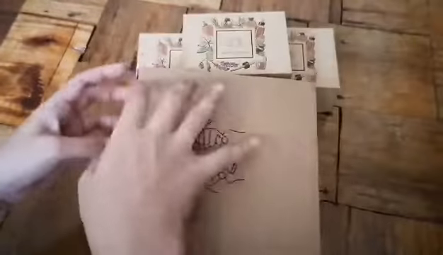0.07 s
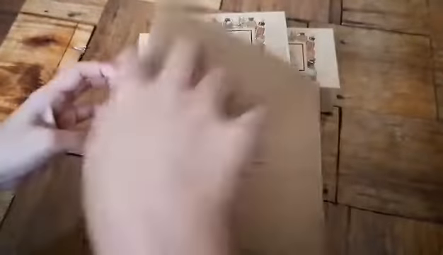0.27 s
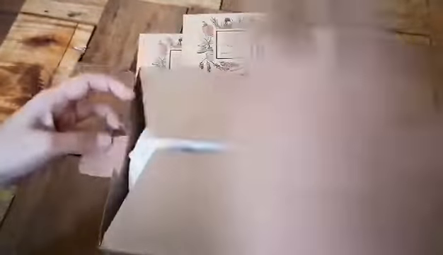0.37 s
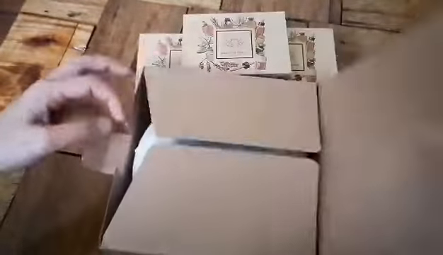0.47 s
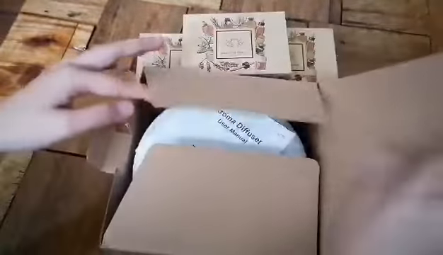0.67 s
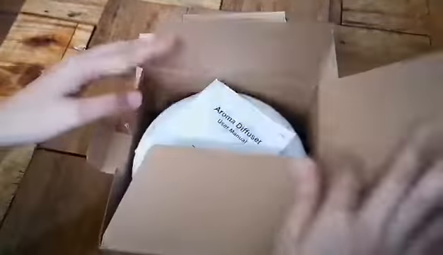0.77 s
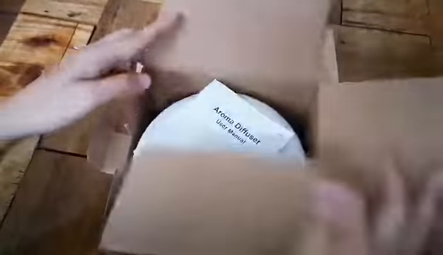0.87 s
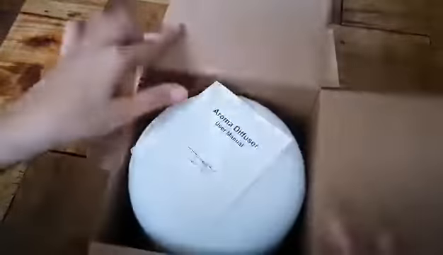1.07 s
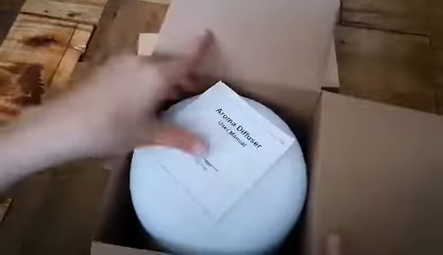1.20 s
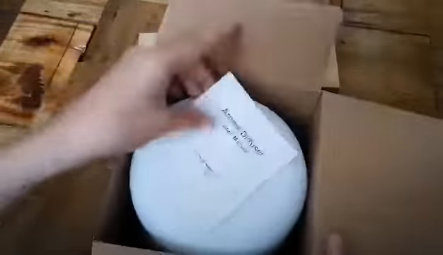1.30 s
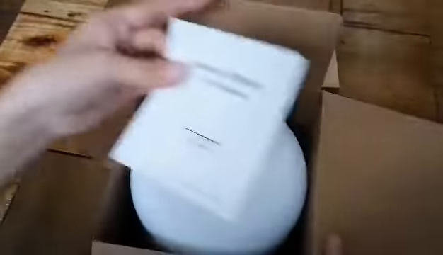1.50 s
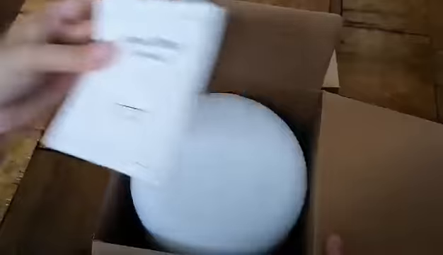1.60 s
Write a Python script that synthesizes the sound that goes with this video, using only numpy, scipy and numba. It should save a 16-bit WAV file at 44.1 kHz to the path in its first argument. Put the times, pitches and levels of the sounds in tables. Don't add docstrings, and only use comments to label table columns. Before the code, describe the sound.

Cardboard box flaps being opened by hand, with rustles, knocks and a final paper swish

```python
import sys
import numpy as np
from scipy import signal
from scipy.io import wavfile
from scipy.ndimage import uniform_filter1d
from numba import njit

SR = 44100
rng = np.random.default_rng(int(sys.argv[2]) if len(sys.argv) > 2 else 0)


def level_to_linear(level):
    exponent = np.asarray(level, float) / 20
    return 10 ** exponent


def generate_wav(signal):
    frames = np.transpose(np.atleast_2d(signal))
    scaled = np.clip(frames, -1, 1) * 32767
    pcm = np.round(scaled).astype(np.int16)
    wavfile.write(sys.argv[1], SR, pcm)


N = 72765

# f/Hz, level/dB
AIR_SPECTRUM = [(25, -1), (60, -12.5), (200, -29), (1000, -25.5), (3000, -33.5), (4000, -40.5),
                (7000, -27.5), (13000, -72)]
# t/s, level/dB
HANDLING_LEVEL = [(0, -63.5), (.2, -58.5), (.3, -52), (.38, -62), (.5, -49.5), (.62, -49), (.74, -49.5),
                  (.8, -60.5), (.86, -47), (1.0, -59.5), (1.1, -57.5), (1.302, -48.5), (1.42, -59.5),
                  (1.65, -66.5)]
# f/Hz, bandwidth/Hz, level/dB
BODY_MODES = [(34, 15.4, -10.5), (54.4, 46, 5.5), (95, 115, 6.5), (130.6, 37, 6.5), (200, 240, -3),
              (228, 35, 1), (289, 16, -18)]
# peak t/s, rise/s, fall T60/s, board level/dB, paper level/dB
RUB_STROKES = [(0.049, 0.096, 1, -61.5, -65.5), (0.167, 0.019, 0.17, -64, -67),
               (0.236, 0.023, 0.79, -47.5, -62), (0.268, 0.044, 0.096, -42.5, -45),
               (0.29, 0.03, 0.077, -41, -36), (.31, 0.011, 0.43, -81, -49.5),
               (0.447, 0.0056, 0.029, -48.5, -52), (.461, 0.0079, 0.085, -54, -48),
               (0.469, 0.0077, 0.027, -41, -33.5), (0.477, 0.0075, 0.09, -66.5, -39.5),
               (.486, .008, 0.18, -53, -44.5), (0.498, 0.012, 0.22, -55, -46.5),
               (0.666, 0.0061, 0.022, -36, -32.5), (0.681, 0.029, 0.3, -46, -46.5),
               (0.737, 0.054, 0.13, -62, -53), (0.772, 0.0092, 0.033, -76, -51.5),
               (.845, 0.017, 0.24, -54, -53), (0.877, 0.042, 0.17, -53.5, -51),
               (0.899, 0.024, 0.18, -63, -53.5), (0.948, 0.012, 0.31, -57, -66.5),
               (0.991, 0.032, 0.28, -61, -56.5), (1.023, 0.013, 0.28, -60.5, -61),
               (1.1, 0.049, 0.99, -65.5, -64.5), (1.206, 0.036, 0.39, -57.5, -53),
               (1.259, 0.0067, 0.09, -46, -45), (1.294, 0.0059, 0.24, -44, -46),
               (1.346, 0.011, 0.16, -50, -61), (1.384, 0.011, 0.14, -47.5, -53.5),
               (1.403, 0.014, 0.21, -62, -55)]
# f/Hz, bandwidth/Hz, level/dB
BOARD_MODES = [(450, 270, 0), (728, 180, -0.5), (1070, 510, 0.5), (1700, 365, 1), (1900, 300, -0.5),
               (2620, 350, -3.5), (3266, 420, -2)]
# f/Hz, bandwidth/Hz, level/dB
PAPER_MODES = [(5000, 2000, -3.5), (6000, 1120, -7.5), (6950, 880, -4), (8160, 1800, -8.5),
               (10030, 370, -15), (11750, 1700, -16)]
# t/s, peak level/dB, f/Hz, T60/s
FINGER_TAPS = [(.012, -48, 845, 0.063), (.045, -52, 906, 0.067), (.158, -50, 1310, 0.12),
               (.166, -42.5, 783, 0.082), (.228, -55, 2760, 0.12), (.235, -43.5, 3920, 0.064),
               (.207, -51.5, 1290, .03), (.2825, -30, 2685, 0.03), (.302, -46, 2700, .03),
               (.318, -46, 2782, 0.047), (.4672, -29.5, 1701, 0.023), (.488, -48.5, 780, 0.12),
               (.616, -47, 618, 0.076), (.664, -40.5, 1038, 0.12), (.661, -35.5, 575, 0.037),
               (.675, -38, 533, 0.018), (.676, -47.5, 1500, 0.022), (.706, -46.5, 636, 0.039),
               (.738, -49, 756, .03), (.77, -51.5, 760, .03), (.822, -46.5, 1065, 0.03),
               (.829, -51, 1053, 0.042), (.84, -48, 757, 0.066), (.855, -44, 506, 0.065),
               (.863, -54.5, 2388, 0.2), (.904, -52, 1700, 0.034), (.945, -51.5, 634, 0.044),
               (.988, -47, 1810, 0.034), (1.019, -54.5, 2980, 0.018), (1.021, -50, 1760, 0.028),
               (1.022, -56.5, 804, 0.058), (1.141, -54.5, 623, 0.046), (1.18, -49, 510, 0.026),
               (1.192, -47.5, 450, 0.12), (1.2, -45.5, 760, 0.078), (1.243, -47, 820, 0.031),
               (1.262, -43.5, 624, 0.045), (1.2908, -35.5, 788, 0.051), (1.2912, -35, 1086, 0.042),
               (1.291, -29, 1830, 0.019), (1.292, -47, 2090, 0.014), (1.203, -46.5, 1673, .03),
               (1.226, -54, 1700, .05), (1.292, -36.5, 443, 0.035), (1.338, -48, 1750, 0.024),
               (1.369, -41.5, 957, 0.043), (1.38, -38.5, 990, 0.015), (1.381, -44, 1756, 0.032),
               (1.433, -53.5, 780, 0.019)]
# t/s, peak level/dB, centre f/Hz
CREASE_CRACKS = [(.052, -45.5, 5000), (0.433, -45, 1010), (0.945, -56, 900), (0.2842, -42, 3870),
                 (0.4454, -48, 7950), (.4475, -34, 5000), (.476, -26.5, 6000), (.4935, -40, 4000),
                 (0.5, -47, 6000), (.822, -49, 4000), (.838, -50, 1500), (.855, -58, 1990),
                 (.876, -51, 5000), (1.02, -53, 2500), (1.37, -55, 2000), (0.4685, -23.5, 5000),
                 (0.6637, -41, 3830), (0.741, -38, 5000), (1.259, -47, 6000), (1.2907, -22, 1780)]
# t/s, peak level/dB, f/Hz, T60/s
FLAP_BOOMS = [(.163, -47.5, 254, 0.083), (.236, -48, 244.4, 0.33), (.281, -39.5, 175.5, 0.096),
              (.285, -38.5, 279, 0.019), (.313, -48, 252, 0.036), (.312, -51, 86, 0.091),
              (.406, -44, 242, 0.033), (.4345, -39, 273, 0.048), (.487, -44, 227, 0.068),
              (.508, -48, 252, 0.11), (.54, -50, 233, 0.14), (.58, -40.5, 292, 0.048),
              (.602, -41, 252, 0.076), (.615, -39, 95, 0.089), (.6623, -30.5, 241, 0.15),
              (.6743, -33.5, 216, 0.053), (.6947, -40, 239.3, 0.24), (.838, -39.5, 127.6, 0.093),
              (.872, -43, 123.4, 0.02), (.91, -45, 205, 0.024), (.926, -39.5, 141, 0.037),
              (.9432, -35.5, 163, 0.057), (.978, -41.5, 170, 0.06), (.9972, -37.5, 159, 0.046),
              (1.018, -40, 193, 0.023), (1.034, -46.5, 206, 0.043), (1.15, -49.5, 144, 0.048),
              (1.22, -45, 124, 0.19), (1.268, -40, 95, 0.065), (1.291, -39, 256, 0.021),
              (1.297, -41, 122, 0.035), (1.3705, -38, 293, 0.015)]
# t/s, f/Hz, level/dB
EDGE_SQUEAK = [
    (.232, 2060, -62),
    (0.239, 2040, -44.5),
    (.25, 2010, -37),
    (0.258, 1980, -28),
    (.268, 1978, -33),
    (.275, 1874, -59),
    (.283, 1754, -30),
    (0.286, 1700, -30),
    (0.291, 1660, -56),
]
# f/Hz, bandwidth/Hz, level/dB
SHEET_MODES = [(5930, 1900, -3.5), (7800, 1040, 3), (9500, 2900, -2.5), (12500, 1500, -8)]
BODY_LAGS = (1, 4, 10)

OVERTONE = 2.1
FLICKER_DB = 5.5
LEFT_DB = -4.8
CRACK_T60_S, CRACK_TOP_HZ = 0.0075, 10100
SLIDE_S, SLIDE_HALF_S, SLIDE_DB = 1.5, 0.021, -44.5
BRUSH_S, BRUSH_HALF_S, BRUSH_DB, BRUSH_HZ = 1.12, 0.33, -67.5, 11300
APART = 0.92
PORT_HZ, PORT_ECHO, SHADOW_HZ = 560, 0.37, 12700
ROOM_T60_S, ROOM_DB, ROOM_HZ = 0.15, -14.5, 1500


@njit
def svf(x, hz, width):
    y, b, l = np.empty(len(x)), 0., 0.
    g, k = np.tan(np.pi * hz / SR), width / hz
    for i in range(len(x)):
        v = (b + g * (x[i] - l)) / (1 + g * (g + k))
        b, l, y[i] = 2 * v - b, l + 2 * g * v, k * v
    return y


def band(x, hz, width):
    return svf(svf(x, hz, width), hz, width)


def unit(x):
    return x / np.sqrt(np.mean(x ** 2))


def fade(t, t60):
    return np.exp(-np.log(1000) * t / t60)


def walk(rate):
    k = int(SR / rate)
    steps = np.repeat(rng.standard_normal(N // k + 1), k)
    return uniform_filter1d(uniform_filter1d(steps, k), k)[:N]


def resonate(x, table, flicker_db, rate):
    total = np.zeros(N)
    for k, (hz, width, db) in enumerate(table):
        level = level_to_linear(db + flicker_db * walk(rate))
        total += (-1) ** k * level * unit(band(x, hz, 2.0 * width))
    return unit(total)


def air():
    hz, db = np.array(AIR_SPECTRUM).T
    total = np.zeros(N)
    for f in 28 * 2 ** np.arange(0, 9, .5):
        level = level_to_linear(np.interp(np.log(f), np.log(hz), db) + 2.5 * walk(7.63))
        total += level * band(rng.standard_normal(N), f, f / 2)
    return level_to_linear(-64.5) * unit(total)


def handling():
    s, db = np.array(HANDLING_LEVEL).T
    level = level_to_linear(np.interp(np.arange(N) / SR, s, db) - 3)
    return level * resonate(rng.standard_normal(N), BODY_MODES, flicker_db=3.5, rate=24.8)


def grit():
    draw = rng.random((N, 2))
    size = level_to_linear(-2 * np.log(1 - .95 * draw[:, 1]))
    slips = draw[:, 0] < 4000 / SR
    return slips * size * rng.standard_normal(N) + 0.15 * rng.standard_normal(N)


def rubbing():
    t = np.arange(N) / SR
    board, paper = np.zeros(N), np.zeros(N)
    for s, rise, t60, board_db, paper_db in RUB_STROKES:
        swell = np.exp(-2 * ((s - t) / rise) ** 2)
        power = np.where(t < s, swell, fade(np.maximum(t - s, 0), t60)) ** 2
        board += level_to_linear(2 * board_db) * power
        paper += level_to_linear(2 * paper_db) * power
    board_sound = np.sqrt(board) * resonate(grit(), BOARD_MODES, FLICKER_DB, 59.62)
    paper_sound = np.sqrt(paper) * resonate(grit(), PAPER_MODES, FLICKER_DB, 90.02)
    return board_sound + paper_sound


def rings(table, rise_cycles, over_db):
    out, t = np.zeros(N), np.arange(N) / SR
    for s, db, hz, t60 in table:
        u = np.maximum(t - s, 0)
        decay = fade(u, t60)
        env = (1 - np.exp(-u * hz / rise_cycles)) ** 2 * decay
        overtone = level_to_linear(over_db) * decay * np.sin(2 * np.pi * hz * OVERTONE * u)
        tone = np.sin(2 * np.pi * hz * u) + overtone
        out += level_to_linear(db) * env / env.max() * tone
    return out


def taps():
    return rings(FINGER_TAPS, rise_cycles=0.28, over_db=-10) * (1 + .5 * unit(walk(500)))


def cracks():
    out, t = np.zeros(N + 2048), np.arange(2048) / SR
    lowpass = signal.butter(2, CRACK_TOP_HZ, fs=SR, output="sos")
    for s, db, hz in CREASE_CRACKS:
        burst = rng.standard_normal(len(t)) * fade(t, CRACK_T60_S)
        snap = signal.sosfilt(lowpass, svf(burst, hz, 2. * hz))
        start = int(s * SR)
        out[start:start + len(t)] += level_to_linear(db) * snap / np.abs(snap).max()
    return out[:N]


def booms():
    return rings(FLAP_BOOMS, rise_cycles=0.39, over_db=-19)


def squeak():
    t = np.arange(N) / SR
    s, hz, db = np.array(EDGE_SQUEAK).T
    pitch = np.interp(t, s, hz) * (1 + .035 * unit(walk(400)))
    sounding = (t > s[0]) & (t < s[-1])
    stutter = 1 + .4 * unit(walk(600))
    size = level_to_linear(np.interp(t, s, db)) * sounding * stutter
    return size * np.sin(2 * np.pi * np.cumsum(pitch) / SR)


def brushing():
    t = np.arange(N) / SR
    airy = svf(svf(rng.standard_normal(N), BRUSH_HZ, 8400.0), BRUSH_HZ, 8300.0)
    env = np.exp(-((t - BRUSH_S) / BRUSH_HALF_S) ** 4)
    return level_to_linear(BRUSH_DB + 2 * walk(21.0)) * env * unit(airy)


def slide():
    t = np.arange(N) / SR
    env = np.exp(-((t - SLIDE_S) / SLIDE_HALF_S) ** 2)
    return level_to_linear(SLIDE_DB) * env * resonate(rng.standard_normal(N), SHEET_MODES, 3.9, 70.1)


def far_port(x):
    low = signal.sosfiltfilt(signal.butter(2, PORT_HZ, fs=SR, output="sos"), x)
    high = x - low
    for lag in BODY_LAGS:
        echo = np.r_[1, np.zeros(lag - 1), PORT_ECHO]
        high = signal.lfilter(echo[::-1], echo, high)
    return low + high - svf(high, SHADOW_HZ, 7500.0)


def room(x):
    t = np.arange(SR // 2) / SR
    out = []
    for _ in range(2):
        onset = np.minimum(t / 0.0029, 1)
        tail = rng.standard_normal(len(t)) * fade(t, ROOM_T60_S) * onset
        tail = svf(tail, ROOM_HZ, 2. * ROOM_HZ)
        out.append(signal.fftconvolve(x, tail / np.sqrt(np.sum(tail ** 2)))[:N])
    return level_to_linear(ROOM_DB) * np.array(out)


def scene():
    body = handling() + taps() + cracks() + booms() + squeak()
    shared, other = (air() + rubbing() + brushing() + slide() for _ in range(2))
    right = body + shared
    left = far_port(body + np.sqrt(1 - APART) * shared + np.sqrt(APART) * other)
    balance = level_to_linear([[LEFT_DB / 2], [-LEFT_DB / 2]])
    return (np.array([left, right]) + room(right)) * balance


def roll_off(x):
    return signal.sosfilt(signal.butter(12, 13860, fs=SR, output="sos"), x)


def record(dry):
    x = np.array([c - 0.36 * svf(c, 4007, 1540) for c in dry])
    x = signal.sosfilt(signal.butter(1, 8540, fs=SR, output="sos"), x)
    x = signal.sosfilt(signal.ellip(8, .2, 70, 13200, fs=SR, output="sos"), x)
    return roll_off(x)


dry = scene()
out = record(dry)
generate_wav(out)
```